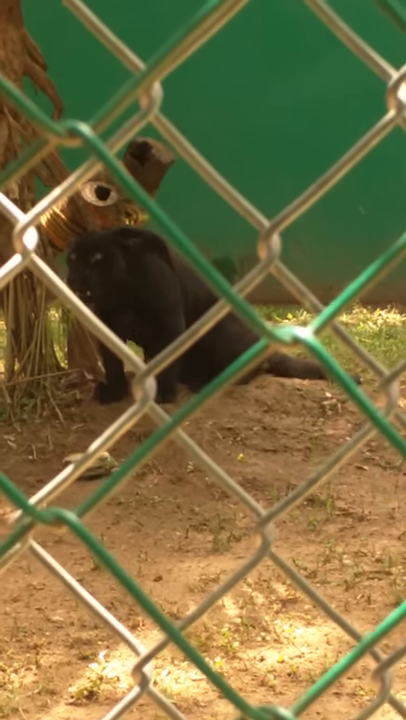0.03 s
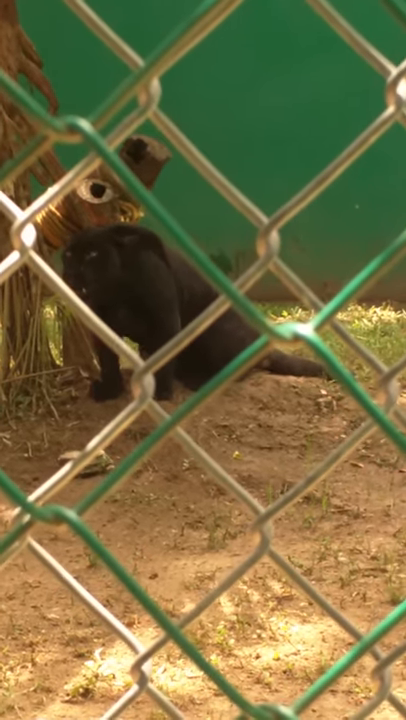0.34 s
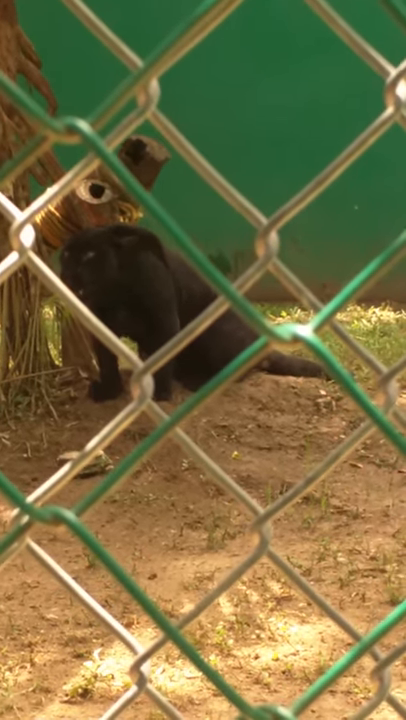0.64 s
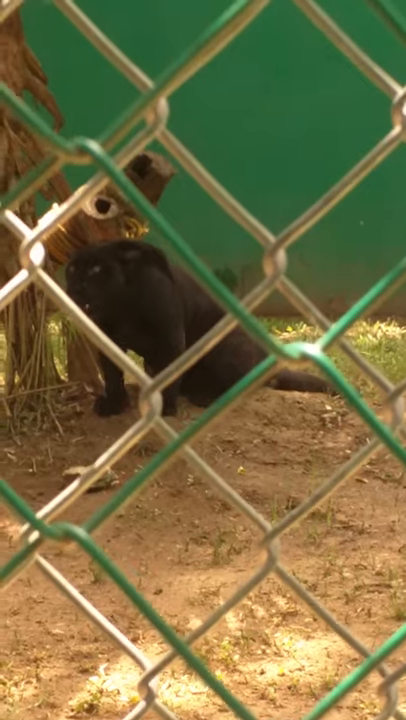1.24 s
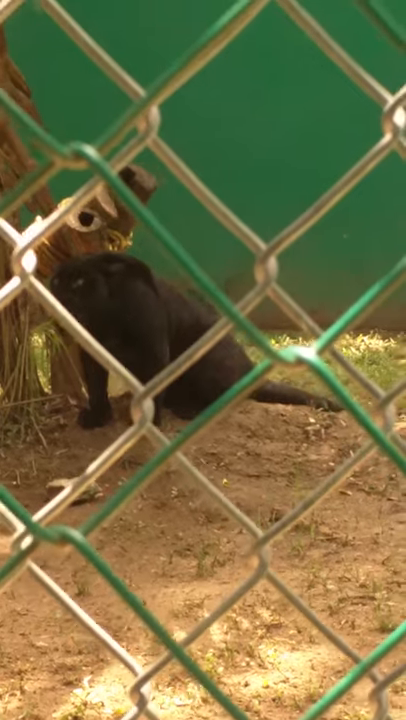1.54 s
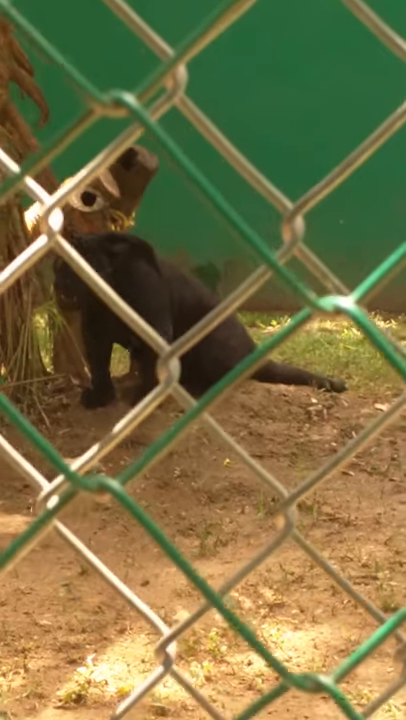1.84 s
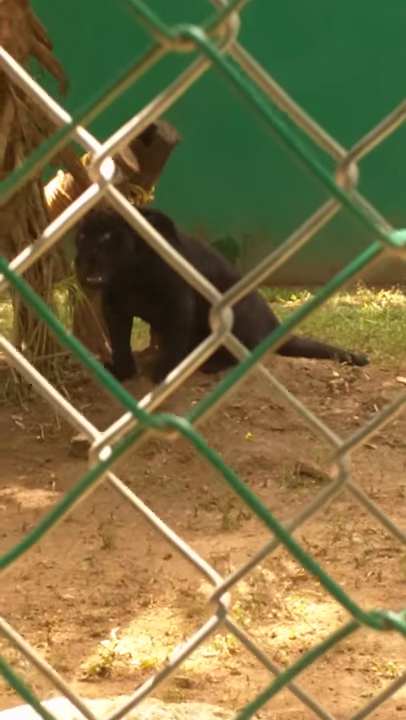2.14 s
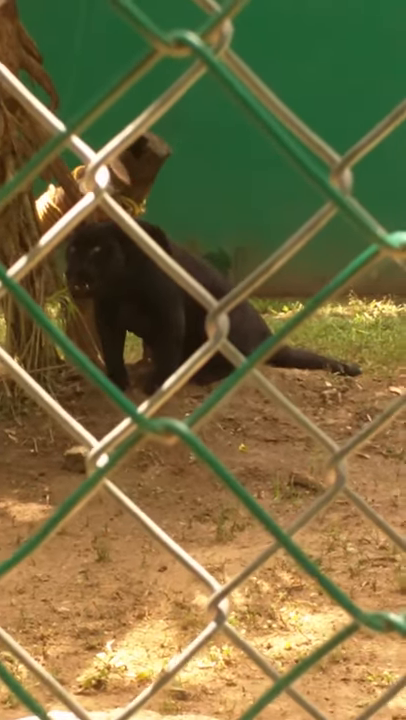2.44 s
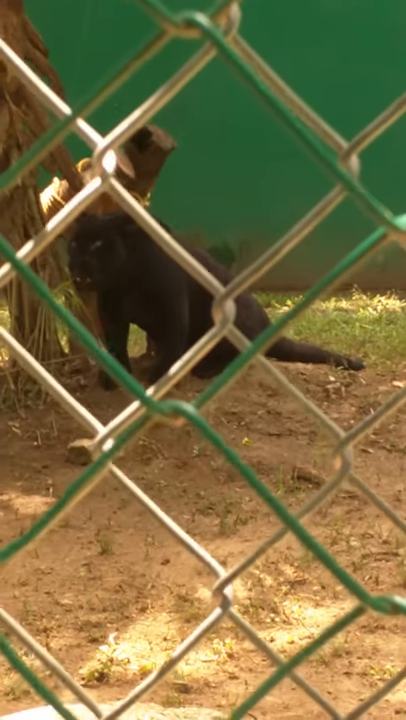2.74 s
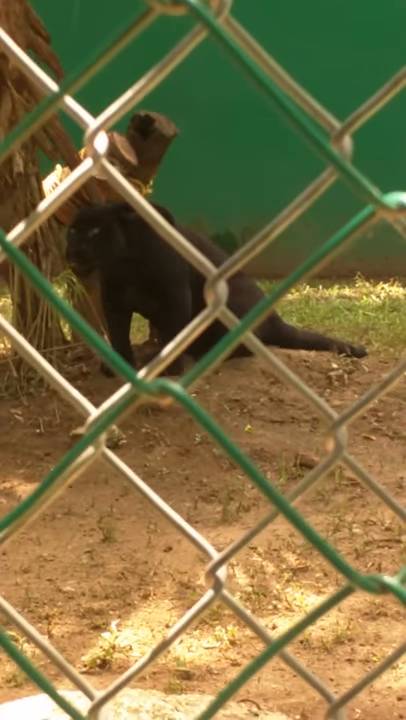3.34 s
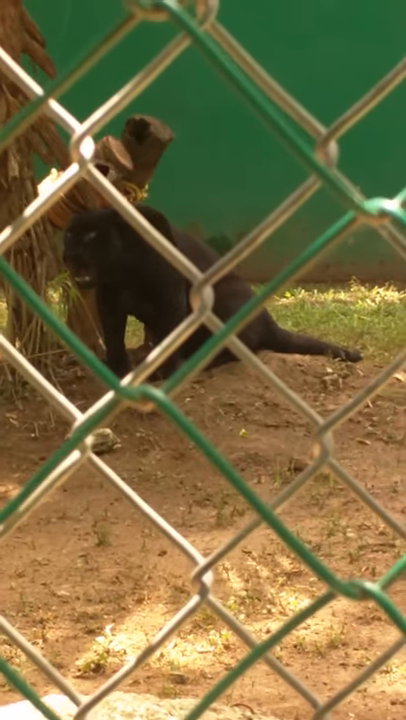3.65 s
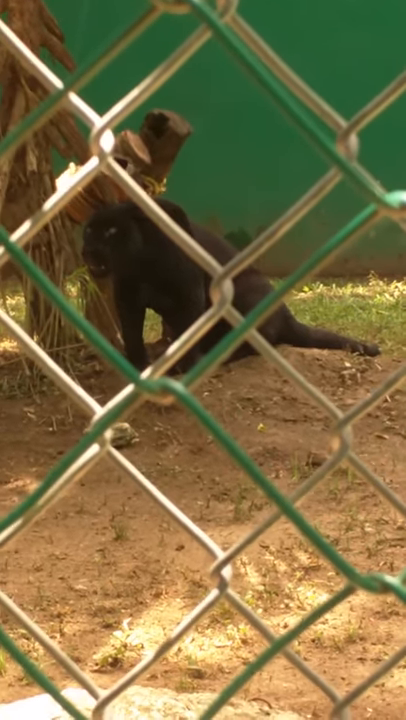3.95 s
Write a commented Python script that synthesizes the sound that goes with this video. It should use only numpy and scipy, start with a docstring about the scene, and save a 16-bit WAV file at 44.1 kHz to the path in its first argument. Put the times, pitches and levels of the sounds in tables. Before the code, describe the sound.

A big cat makes repeated hoarse, sawing calls in an outdoor enclosure.

```python
"""Hoarse, sawing calls, one after another: a black big cat in a walled outdoor enclosure.
Each call is one arch of pitch from the vocal folds: a strong fundamental, jittery overtones
and a rasp of chopped air. The hardest calls break into a rough roar at the top.
One microphone stands far enough off to hear the walls throw the calls back, over a low steady rumble."""
import sys
import numpy as np
from scipy import signal
from scipy.fft import rfft, irfft
from scipy.io import wavfile

SR = 44100
rng = np.random.default_rng(int(sys.argv[2]) if len(sys.argv) > 2 else 0)


def wrap_up_sound(samples):
    """Save the sound to the file named by the first command line argument, as 16-bit audio."""
    columns = np.atleast_2d(samples).T
    # keep every value between -1 and 1, then stretch to whole-number steps
    tamed = np.clip(columns, -1, 1)
    steps = np.round(tamed * 32767).astype(np.int16)
    wavfile.write(sys.argv[1], SR, steps)


N = 176400

# the cat's calls (start [s], rise [s], fall [s], top pitch [Hz], end pitch [Hz], fundamental [dB],
# overtones [dB], rasp [dB], hiss [dB], mouth opening [0-1], throat tuning [factor], break-up [s])
CALLS = [ (-.17, 0.12, 0.073, 240, 213.3, -14, -23.5, -29, -33.5, 0.76, 0.98, 0.0053),
         (.2, 0.11, 0.06, 243.9, 202.8, -13.5, -21, -26.5, -29.5, 0.66, 0.99, 0.0026),
         (.558, 0.082, 0.057, 215, 177, -17.5, -21.5, -30, -37.5, 0.36, 1.012, 0.00094),
         (.872, 0.089, 0.055, 224.7, 182, -15, -22, -28.5, -36.5, 0.18, 1.008, 0),
         (1.211, 0.09, .07, 215.6, 179.3, -16.5, -22, -29.5, -41, 0.21, 1.003, 0),
         (1.638, 0.18, .08, 237.3, 201.7, -14.5, -20, -27.5, -32.5, 0.47, 1.018, 0.0024),
         (2.202, 0.2, 0.041, 278, 231.2, -13.5, -17.5, -23, -29, 1, 1.015, 0.048),
         (2.66, .085, 0.0867, 199.8, 180.2, -18, -23, -30, -40, 0.5, 1.015, 0),
         (3.095, 0.18, 0.069, 262.9, 215.8, -13, -19.5, -24.5, -30, 0.87, 1.004, 0.031),
         (3.729, .205, .13, 242.9, 216, -15.5, -19, -26, -35.5, 0.86, 1.06, 0)]
# gain in even steps over each rise (fundamental [dB], overtones [dB], rasp [dB], hiss [dB])
RISE_SWELL = [(-25, -15, -14.5, -13), (-9, -8, -9, -11), (-4.5, -1.5, -2, -9.5), (0.5, 1, -1.5, 3.5),
              (1.5, 0, -0.5, 2.5)]
# further gain by the end of the fall (fundamental [dB], overtones [dB], rasp [dB], hiss [dB])
FALL_FADE = (-4.5, -7, -2.5, -6.5)
# overtones at the folds (frequency [Hz], gain [dB])
OVERTONE_SPECTRUM = [(300, 4.5), (360, 1.5), (425, -5), (490, -1.5), (700, 0.5), (900, -2.5), (1200, 0.5),
                     (1600, -4), (2700, -10), (5000, -16)]
# rough air at the folds (frequency [Hz], gain [dB])
RASP_SPECTRUM = [(150, -10.5), (400, -3), (1000, 4.5), (2000, -2), (4000, -5.5), (12000, -13.5)]
# air rushing through the mouth (frequency [Hz], gain [dB])
HISS_SPECTRUM = [(300, 9), (1000, -18), (2500, 7), (5000, -4.5), (15000, -1)]
# throat resonances, mouth nearly shut (frequency [Hz], width [Hz], gain [dB])
SHUT_RESONANCES = [(333, 38, -2), (660.6, 32, -5), (863, 60, 2.5), (1103, 72, -6.5), (1491, 23, -2),
                   (2330, 180, -14.5), (2570, 90, -11.5), (3470, 470, -14.5), (4200, 116, -24),
                   (4780, 240, -15), (5700, 380, -21), (7960, 1400, -24)]
# throat resonances, mouth wide (frequency [Hz], width [Hz], gain [dB])
WIDE_RESONANCES = [(369, 143, -2.5), (482, 59, -11.5), (696.3, 58, 0.5), (886, 148, -5), (1215, 68, -5.5),
                   (1609, 66, -7), (2175, 117, -8.5), (2656, 66, -10.5), (3270, 830, -19),
                   (3870, 80, -15.5), (4790, 220, -16), (5880, 260, -24), (7960, 1600, -22)]
# broad passage between the resonances (frequency [Hz], gain [dB])
THROAT_FLOOR = [(60, -45), (200, 3.5), (550, -20.5), (1000, -24), (1900, -22.5), (3000, -39), (4500, -21.5),
                (7000, -27.5), (10000, -24.5), (13000, -33.5), (16000, -39)]
# direct sound at the microphone, partly cancelled by a near reflection (frequency [Hz], gain [dB])
DIRECT_PATH = [(150, -3), (200, -0.5), (236, -1.5), (251, -4.5), (268, -7), (300, -7.5), (345, -2),
               (1000, 0)]
# echoes off the walls (delay [s], gain [dB])
WALL_ECHOES = [(.031, -29.5), (0.057, -17.5), (.096, -13.5), (0.129, -28), (.152, -20.5), (.21, -20)]
# diffuse tail of the enclosure (frequency [Hz], time to fall 60 dB [s], gain [dB])
TAIL_DECAY = [(152, 1.05, -18), (250, 1.6, -10.5), (475.9, 0.95, -10.5), (830, 0.7, -2), (2320, 0.66, -7.5),
              (5150, 0.68, -0.5), (11800, 0.17, -1.5)]
# onset of that tail (frequency [Hz], build-up time [s])
TAIL_ONSET = [(250, 0.12), (700, 0.016), (3000, 0.004)]
# outdoor background (frequency [Hz], relative density [dB])
RUMBLE_SPECTRUM = [(10, -9.5), (25, 1), (40, 1.5), (55, 3.5), (75, 0), (110, -10.5), (200, -3.5),
                   (400, -21), (900, -17.5), (2000, -28), (4000, -36.5), (7000, -40), (12500, -39),
                   (14000, -43), (16000, -49)]


def call(rise, fall, top_hz, end_hz, tone_db, overtone_db, rasp_db, hiss_db, mouth, tuning, break_s):
    """One push of air from the cat: pitch and loudness climb and sink together."""
    start_hz, attack_s, release_s = 140.24, .014, .028
    t, bins = np.arange(SR) / SR, np.fft.rfftfreq(SR, 1 / SR)
    risen = np.minimum(t / rise, 1)
    below_top = 1 - np.sin(np.pi / 2 * risen ** 1.2)
    fallen = np.clip((t - rise) / fall, 0, 1.2) ** 2.02
    hz = top_hz + (start_hz - top_hz) * below_top + (end_hz - top_hz) * fallen
    broken = break_up(t - rise, break_s)
    jitter_cycles = .009 + .01 * below_top + .063 * broken
    cycles = np.cumsum(hz * (1 + .0047 * wander(hz=31.2))) / SR  # the pitch wavers slightly
    cycles += jitter_cycles * wander(hz=122.6)
    passage = throat(bins / tuning, mouth)
    tone = np.sqrt(2) * np.cos(2 * np.pi * cycles) * (1 - .44 * broken) * flutter(.07)
    overtones = fold_overtones(hz, cycles, risen, passage, bins)
    rasp, hiss = chopped_air(cycles, passage, bins)
    voice = amp(rasp_db) * opening_breath(t, rasp, bins)
    layers = (tone, tone_db), (overtones, overtone_db), (rasp, rasp_db), (hiss, hiss_db)
    steps = np.linspace(0, 1, len(RISE_SWELL))
    for (sound, db), swell, fade in zip(layers, np.transpose(RISE_SWELL), FALL_FADE):
        voice += sound * amp(db + np.interp(risen, steps, swell) + fade * fallen)
    gate = np.minimum(t / attack_s, 1) * np.clip((rise + fall - t) / release_s + .5, 0, 1)
    return gate * voice


def break_up(since_top, length_s, end_s=.00995, edge_s=.0029):
    """How far the folds lose their rhythm (0-1), until just past the top of the arch."""
    late = since_top - end_s
    return (np.tanh((late + length_s) / edge_s) - np.tanh(late / edge_s)) / 2


def fold_overtones(hz, cycles, risen, passage, bins, snarl_hz=1065, snarl_width_hz=60):
    """Harmonics of the folds through the throat; one band snarls out part way up the rise."""
    spectrum = passage * amp(read(OVERTONE_SPECTRUM, bins))
    snarl = (amp(6) - 1) * np.exp(-((risen - .4) / .11) ** 2)
    overtones = np.zeros(SR)
    for k in range(2, 22):
        boost = 1 + snarl / (1 + ((k * hz - snarl_hz) / snarl_width_hz) ** 2)
        gain = np.interp(k * hz, bins, spectrum) * boost
        overtones += gain * np.cos(2 * np.pi * (k * cycles + rng.random()))
    return overtones * flutter(.11)


def chopped_air(cycles, passage, bins, leak=.42, decay_cycles=.28):
    """Rasp and hiss: air escapes the folds in one uneven puff a cycle over a steady leak."""
    strength = amp(1.6 * rng.standard_normal(SR))[cycles.astype(int)]
    puffs = (leak + strength * np.exp(-(cycles % 1) / decay_cycles)) * flutter(.28)
    for spectrum in (RASP_SPECTRUM, HISS_SPECTRUM):
        air = rfft(puffs * rng.standard_normal(SR))
        yield unit(irfft(air * passage * amp(read(spectrum, bins))))


def opening_breath(t, rasp, bins, whistle_hz=8290, width_hz=120, whistle_s=.11, catch_at_s=.012):
    """A thin whistling hiss and a short raspy catch as each push begins."""
    band = 1 / (1 + ((bins - whistle_hz) / width_hz) ** 2)
    whistle = unit(irfft(rfft(rng.standard_normal(SR)) * band))
    whistle *= np.sin(np.pi * np.minimum(t / whistle_s, 1))
    catch = rasp * np.exp(-((t - catch_at_s) / .0043) ** 2)
    return amp(-29.5) * whistle + amp(-12) * catch


def throat(hz, mouth):
    """Gain of the resonating throat, between mouth nearly shut (0) and wide open (1)."""
    shut, wide = (
        sum(amp(2 * db) / (1 + 2 * ((hz - centre) / width) ** 2) ** 2 for centre, width, db in table)
        for table in (SHUT_RESONANCES, WIDE_RESONANCES))
    return np.sqrt((1 - mouth) * shut + mouth * wide + amp(2 * read(THROAT_FLOOR, hz)))


def enclosure(cat):
    """What reaches the microphone: direct sound, a diffuse tail and a few dull wall echoes."""
    heard = colour(cat, DIRECT_PATH) + signal.fftconvolve(cat, diffuse_tail())[:len(cat)]
    dull = colour(cat, [(250, 2), (1000, -8), (6000, -3.5)])  # (frequency [Hz], gain [dB])
    for delay, db in WALL_ECHOES:
        add(heard, delay, amp(db) * dull)
    return heard


def diffuse_tail():
    """Scattered reflections between the walls, building and dying at each band's own rate."""
    density = .1  # reflections per sample
    taps = rng.choice([-1., 1.], SR) * (rng.random(SR) < density)
    hz, t, bands = signal.stft(taps, SR, nperseg=512)
    t60 = read(TAIL_DECAY, hz)[:, None]
    energy = density * t60 * SR / np.log(10 ** 6)
    bands *= amp(read(TAIL_DECAY, hz, column=2)[:, None] - 60 * t / t60) / np.sqrt(energy)
    bands *= np.minimum(t / read(TAIL_ONSET, hz)[:, None], 1)
    return signal.istft(bands, SR, nperseg=512)[1][:SR]


def rumble(level_db=-36):
    """Steady outdoor rumble with a faint hiss, behind the cat."""
    return amp(level_db) * unit(colour(rng.standard_normal(N), RUMBLE_SPECTRUM))


def flutter(depth):
    """A gain that trembles quickly around 1."""
    return 1 + depth * wander(hz=59.4)


def wander(hz):
    """One second of smooth random motion, up to about the given rate."""
    lowpass = np.exp(-(np.arange(SR // 2 + 1) / hz) ** 2)
    return unit(irfft(rfft(rng.standard_normal(SR)) * lowpass, SR))


def colour(x, table):
    """Filters x by a spectrum."""
    return irfft(rfft(x) * amp(read(table, np.fft.rfftfreq(len(x), 1 / SR))), len(x))


def read(table, hz, column=1):
    """Reads a table on a log-frequency axis."""
    table = np.array(table)
    return np.interp(np.log(hz + 1), np.log(table[:, 0] + 1), table[:, column])


def amp(db):
    return 10 ** (np.asarray(db) / 20)


def unit(x):
    return x / np.sqrt(np.mean(x ** 2) + 1e-20)


def add(mix, start_s, sound):
    part = mix[max(round(start_s * SR), 0):][:len(sound)]
    part += sound[:len(part)]


def scene():
    """The cat, already calling, heard from one spot in its enclosure."""
    lead_s = .5  # room for the call already under way
    lead = round(lead_s * SR)
    cat = np.zeros(lead + N)
    for start, *shape in CALLS:
        add(cat, lead_s + start, call(*shape))
    return (enclosure(cat)[lead:] + rumble())[None]


def record(dry):
    """The recorder's band limit on the mono microphone."""
    cutoff_hz = 15700
    lowpass = signal.firwin(511, cutoff_hz, window=("kaiser", 9), fs=SR)
    return signal.oaconvolve(dry, lowpass[None], "same")


dry = scene()
out = record(dry)
wrap_up_sound(out)
```